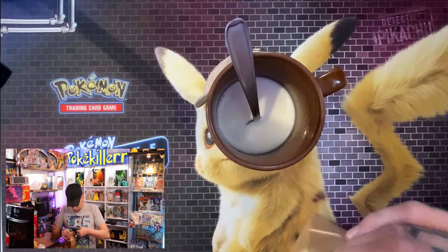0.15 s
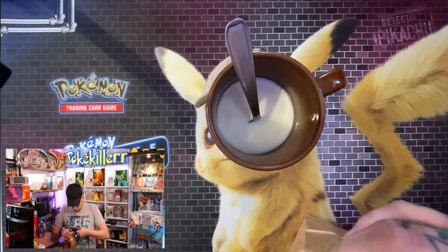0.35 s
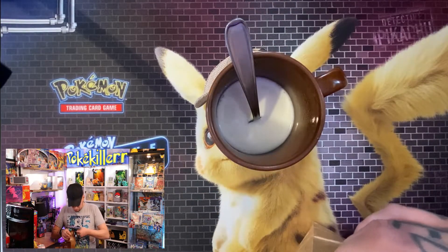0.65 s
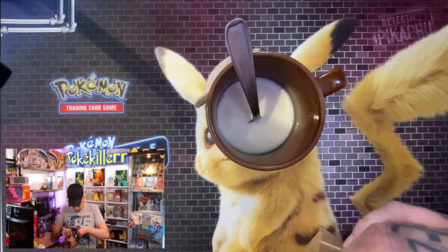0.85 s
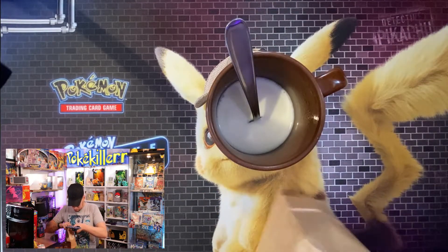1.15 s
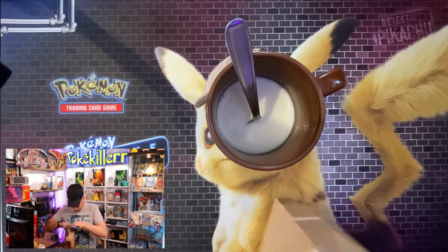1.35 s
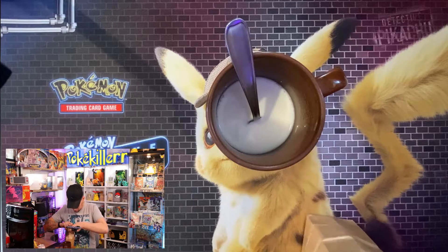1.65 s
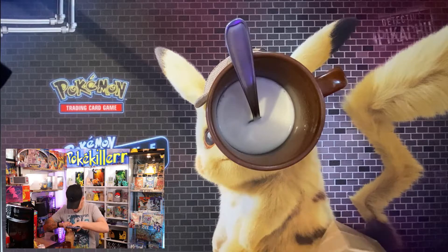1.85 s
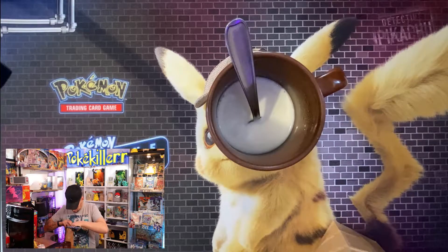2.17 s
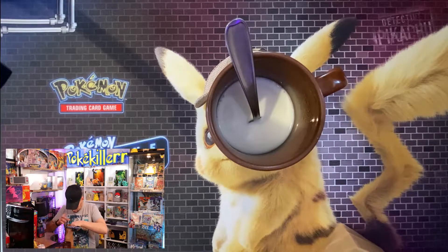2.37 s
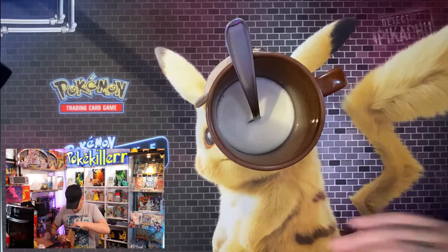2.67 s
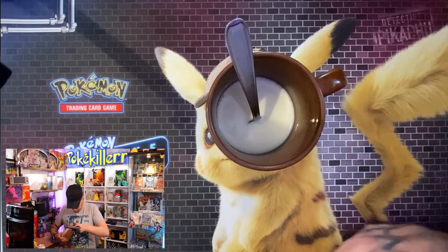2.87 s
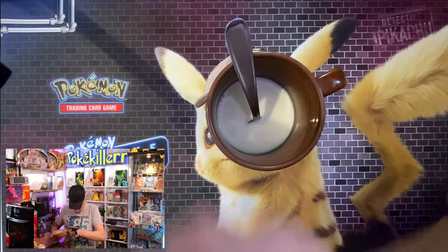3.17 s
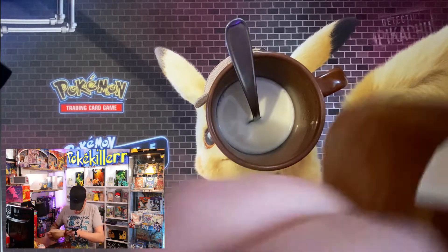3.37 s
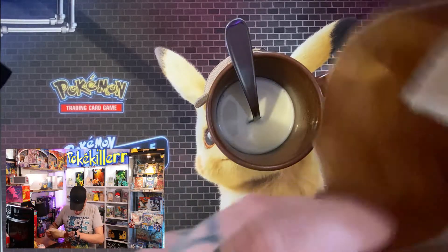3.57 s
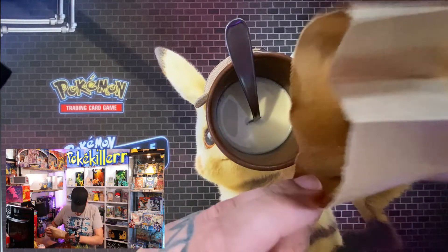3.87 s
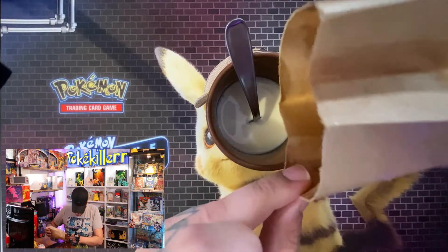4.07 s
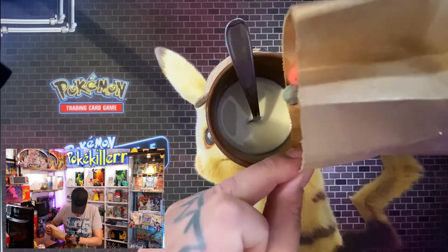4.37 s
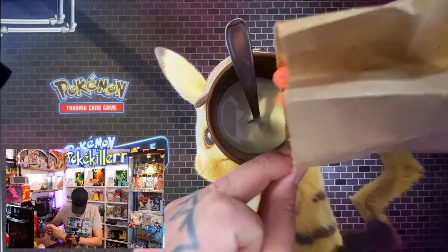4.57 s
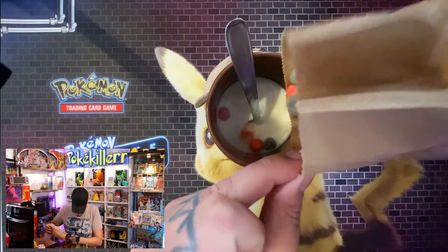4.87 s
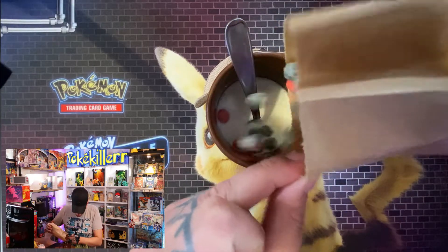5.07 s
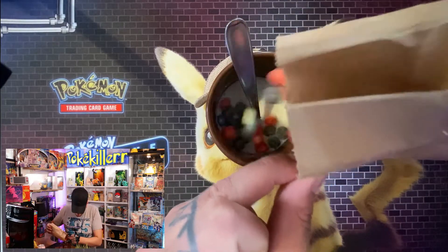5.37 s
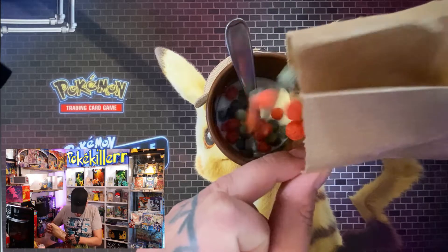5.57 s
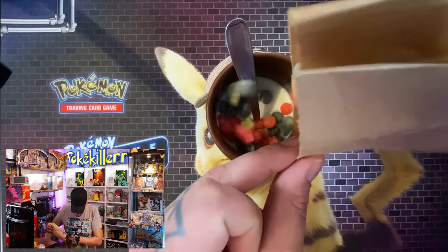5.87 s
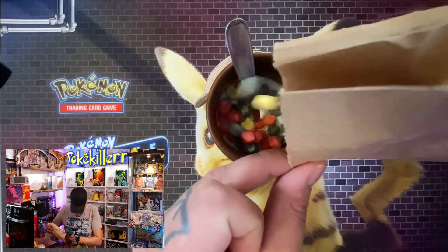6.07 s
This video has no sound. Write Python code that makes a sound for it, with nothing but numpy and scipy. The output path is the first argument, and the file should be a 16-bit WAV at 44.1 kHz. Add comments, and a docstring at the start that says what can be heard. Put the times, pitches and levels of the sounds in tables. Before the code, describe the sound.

A small, quiet room with a faint low rumble and mains hum, heard by a close stereo microphone. From 0 to 0.6 seconds a paper bag gives soft crinkles and a dull bump, then thins to near quiet. From 0.7 the creasing grows sharp, and between 1.0 and 2.1 it is very loud: hard, bright cracks and dense crackle with low thumps, the strongest slightly clipped. It drops away around 2.2 to 2.6, then a few firm folds and a hollow bump come at 2.6 to 2.9. Softer, boxy rustling and small snaps follow from 3.0 to 4.3 as the bag is opened and tipped. From about 4.4 the first pieces clink in a mug; from 4.9 to the end at about 6.2, cereal tumbles steadily with papery rustle, dry bright ticks, soft thumps and short, quickly damped ceramic clinks.

```python
"""In a small room with a faint low rumble, a paper bag is crumpled open, then tipped to pour cereal into a mug.
Creases snap: a short crack, then noise shaped by the paper and the air inside. A dense crackle of tiny
bursts and knocks fills the gaps, with soft low thumps as the load shifts. Later, pieces ring the mug as
fading sine waves and click on each other as short bright noise. The room answers with a random, fading tail."""
import sys
import numpy as np
from scipy import signal
from scipy.fft import rfft, irfft, next_fast_len
from scipy.io import wavfile
from scipy.ndimage import uniform_filter1d

SR = 44100
rng = np.random.default_rng(int(sys.argv[2]) if len(sys.argv) > 2 else 0)


def dump_mix(stems):
    """Bounce the given channels to the path in sys.argv[1] as a 16-bit WAV at rate SR."""
    frames = np.atleast_2d(stems).T  # one column per channel
    limited = np.clip(frames, -1, 1)  # hard clip at full scale
    pcm = np.round(limited * 32767).astype(np.int16)
    wavfile.write(sys.argv[1], SR, pcm)


N = 274434  # length in samples

# The colour of the steady room sound. Each row: frequency in Hz, relative level in dB per Hz.
ROOM_TONE = [(30, -22), (45, -17), (54, -10), (59.5, 9.5), (65, -4), (300, -15), (900, -22), (3000, -19.5),
             (8000, -39), (15600, -26.5)]
# The background crackle, rising and falling. Each row: time in seconds, level of the middle part in dB,
# then the hollow and the crisp part in dB against the middle.
RUSTLE = [(0, -36.5, 2, -9.5), (.15, -52, 8, -2.5), (.52, -57, 4, -2), (.68, -52, 5, -6),
          (.75, -39, -9, -2), (1.1, -37, -0.5, -6), (1.4, -44.5, -6, -7), (2.2, -37.5, -0.5, -13),
          (2.32, -45, 7.5, -6), (2.45, -55, -5, -7), (2.58, -77, 27, -19), (2.7, -36.5, 8, -9.5),
          (3.15, -40.5, -3, -7), (3.4, -45, -2, -11.5), (3.5, -37.5, 4, -12.5), (3.9, -35, 2.5, -8),
          (5.3, -35.5, 1.5, -8), (5.75, -38.5, 0, -5.5), (6.22, -36.5, 0.5, -9.5)]
# Squeezes and shakes of the bag, each a swell of crackle. Each row: time at full level in seconds,
# level of the middle part in dB, hold in seconds, hollow part in dB against the middle.
SQUEEZES = [(0.252, -39.5, 0.0098, -2), (0.843, -37, 0.11, -0.5), (1.128, -34.5, 0.091, 3),
            (1.236, -31, 0.023, -1), (1.3, -19.5, 0.026, -9), (1.44, -25, 0.0042, 0),
            (1.5, -33, 0.13, -4.5), (1.685, -19.5, 0.017, -2), (1.741, -21, 0.018, -4.5),
            (1.765, -17.5, 0.01, 1), (1.826, -34.5, 0.013, 5), (1.942, -32, 0.015, 5.5),
            (2.029, -18, 0.0063, 1.5), (2.082, -25, 0.016, 0.5), (2.621, -29.5, 0.041, 6),
            (2.808, -29.5, 0.024, 2), (2.89, -33.5, 0.012, 4), (3.023, -45.5, 0.014, 14.5),
            (3.144, -41, 0.1, 8.5), (3.482, -36, 0.018, 4), (3.577, -35.5, 0.006, 7.5),
            (3.648, -43, 0.0087, 15), (3.722, -34, 0.0079, 3), (3.765, -31.5, 0.012, 4.5),
            (3.807, -29.5, 0.023, 0), (4.143, -34, 0.043, 2), (4.387, -35.5, 0.028, -15),
            (4.65, -39, 0.033, -5), (4.722, -31.5, 0.0086, 5), (4.814, -37, 0.016, 9),
            (4.922, -37, 0.013, 5.5), (5.037, -38, 0.011, -14), (5.08, -44, 0.0074, 11),
            (5.19, -32.5, 0.061, -5), (5.593, -36.5, 0.023, 6.5), (5.875, -28.5, 0.01, 1.5),
            (6.1, -39, 0.021, 6)]
# The broad colour of paper. Each row: frequency in Hz, relative level in dB per Hz.
PAPER = [(47, -48), (80, -12), (236, -7.5), (314, -5), (350, -7), (945, 0.5), (1290, -2.5), (3550, -8),
         (8770, -22.5), (13900, -28.5), (15600, -36)]
# Resonances of the bag's air and walls. Each row: frequency in Hz, width in Hz, boost in dB.
BAG = [(1080, 470, 1), (3395, 880, 6), (2340, 860, 2.5), (5150, 2000, 6.5)]
# The bag's load shifts and bumps the desk. Each row: start in seconds, level in dB, tone in Hz.
THUMPS = [(0.0523, -22.5, 568), (0.917, -28, 311), (1.199, -23.5, 266), (1.279, -27, 263), (1.69, -18, 322),
          (2.025, -27, 268), (2.628, -39, 443), (2.838, -20.5, 458), (3.575, -32, 386), (3.722, -24, 344),
          (3.811, -29.5, 146), (4.6, -29.5, 317), (4.729, -32, 133), (5.605, -29, 399), (5.639, -22.5, 486),
          (5.719, -27.5, 493)]
# Single creases. Each row: start in seconds, level in dB, tone of the sheet in Hz, # then the hollow and the
# crisp part in dB against the middle part. # The row at 1.3081 s is not a crease of its own: it is the wall's
# slap of the crease just before it.
SNAPS = [(0.053, -25.5, 1850, 11, -30), (0.099, -20, 4700, -19, -7), (0.162, -22, 3100, -18, -31),
         (0.258, -33.5, 4470, -8, 7), (0.387, -23, 4700, -2, -15), (0.5649, -20, 2280, 2.5, -23),
         (0.7077, -12.5, 3820, 1, -6.5), (0.7515, -19, 3570, 1.5, -6), (0.8026, -32.5, 3040, 14.5, 3),
         (0.8419, -8.5, 3720, -5.5, -8), (0.8606, -10, 3300, -29, -10), (0.9207, -16.5, 2900, 6.5, -25),
         (0.9445, -23.5, 1930, 10, -23), (.996, -10.5, 2480, -27, -29), (1.019, -1, 3330, -33, -6),
         (1.1106, -17, 2310, -8, -4.5), (1.1555, -6, 2940, -5, -37), (1.1867, -8.5, 2960, -6, -28),
         (1.2251, -7, 3650, -20, -28), (1.269, -4, 2090, -9, -32), (1.2936, -0.5, 1950, -8, -10),
         (1.3081, -3, 2030, -0.5, -5), (1.3338, -1, 2800, -11, -3.5), (1.428, -1.5, 4500, -9.5, -4.5),
         (1.5241, -5.5, 3100, -4.5, -9), (1.5995, -17.5, 4300, -1, -12), (1.6179, -13, 1760, 1.5, -25),
         (1.6558, -3, 3230, -40, -12), (1.679, 4, 4300, -37, -5.5), (1.7719, -2.5, 3840, -11, -3),
         (1.8278, -28.5, 2270, 20, -20), (1.9433, -1, 1850, -8.5, -43), (2.018, -15, 3500, 4, -7),
         (2.024, -3.5, 1520, 2, -17), (2.0278, 0, 2570, -20, -6), (2.0504, 5, 4160, -19, -9),
         (2.0684, -2.5, 1670, 0, -4.5), (2.2038, -34.5, 1700, -15, 9.5), (2.254, -27.5, 1670, 16, -48),
         (2.5239, -25, 1900, 6, -40), (2.617, -25, 2100, 9, -58), (2.7089, -15.5, 2000, 1.5, -38),
         (2.766, -5.5, 2050, -15, -15.5), (2.813, -16, 2500, -4, -9), (2.826, -9.5, 1710, -14, -6),
         (2.893, -16.5, 2080, -4.5, -23), (3.0269, -14.5, 3350, -14, -14), (3.3235, -15, 2120, 1.5, -14),
         (3.5715, -19.5, 2580, 11, -15), (3.644, -14, 3580, -21, -11), (3.7192, -20.5, 2800, 8.5, -3),
         (3.7641, -9, 2300, -0.5, -15), (4.351, -28, 3000, -8, -9), (4.6559, -7, 4830, -35, -11),
         (4.7176, -10, 2550, -5, -17), (4.867, -20, 3460, -11, -13), (5.01, -18, 3480, -20, -7),
         (5.079, -17, 2500, -6, -20), (5.178, -23, 3470, -22, -5), (5.328, -15.5, 3270, -3, -5.5),
         (5.466, -19, 3150, -13, -8), (5.8186, -23, 1970, 8.5, 0), (5.879, -7, 3640, -32, -7),
         (5.9448, -22.5, 3110, -6, -1), (6.107, -16, 3280, -10, -22)]
# Pieces striking the mug. Each row: start in seconds, blow in dB,
# then the extra level in dB of the mug's first and last mode.
CLINKS = [(4.4662, -27, 7, -3), (4.658, -28, 11, -14), (4.7606, -31, -2, -4), (4.813, -25, 4, -4),
          (4.9322, -26, 3, -1), (5.0345, -24, 2, -9), (5.2031, -23.5, 5.5, -9), (5.2355, -25, -6, -2),
          (5.2934, -31, -5, -5), (5.3652, -23, 3, -9), (5.3882, -30, 9, -14), (5.5029, -22, 4, -12),
          (5.5165, -27, -4, -4), (5.5528, -27, 2, -7), (5.6311, -23.5, -10, 0), (6.0317, -26, 0, -14),
          (6.1963, -24, 8, -4)]
# The mug's ringing modes. Each row: frequency in Hz, level in dB, time to fall by 60 dB in seconds.
MUG = [(2295, -4.5, .05), (5830, -7, .04), (6420, -5, .04), (7890, -16, .04), (9400, -9, .03),
       (9580, -12, .045), (13900, -1, .022)]
# The slap from one hard wall. Each row: frequency in Hz, level in dB.
ECHO = [(500, -14), (5000, -12), (14000, -2)]
# Sound that the two ports do not share. Each row: frequency in Hz, level in dB.
APART = [(60, -23), (300, -8.5), (1000, -14), (2500, -17), (5000, -10), (9000, -1.5), (15000, -5.5)]
# Timing between the two ports. Each row: frequency in Hz, lead of the left port in radians.
PORTS = [(100, 0), (5000, .3), (7500, 1.2), (9200, 3), (12000, 5), (15000, 5.7)]

# T60 is the time a sound takes to fall by 60 dB
HOLLOW_HZ, CRISP_HZ = 1580, 6060  # where the bag's hollow tone ends and the crisp top begins
ROOM_TONE_DB = -50.5
HUM_HZ, HUM_DB, HUM_LEFT_DB = 49.9, -58.5, 5  # mains hum, and how much stronger it is on the left
SWELL_DB_PER_S, FADE_DB_PER_S = 795, 277  # how fast a squeeze rises and falls
SQUEEZE_CRISP_DB = -7.5  # crisp part of a squeeze against its middle
TINY_CREASES_PER_S, KNOCK_COUNT, KNOCKS_DB = 1500, 2500, -10.5  # knocks against the fine grain
OPEN_S, AIR_HZ, AIR_WIDTH_HZ, AIR_DB = 3.3, 960, 130, 8  # bag's air colours the crackle until it stands open
SNAP_T60_S, LONGER_PER_DB = 0.123, .02  # ring of a 0 dB crease; softer ones ring longer by this share
CRACK_CYCLES = 1.25  # cycles in which a crack falls to 37 percent
CRACK_DB, CRACK_PER_DB = 13, .2  # crack over the shiver for a 0 dB crease; softer ones crack less
CAVITY_HZ, CAVITY_WIDTH_HZ, CAVITY_DB = 835, 430, 7  # air in the bag, rung by each crease
CRISP_EXTRA_T60_S = .04  # added fading, so the top of a crease dies first
POUR_S, TICKS_PER_S, SOFTEST_TICK_DB, TICK_HZ = 4.85, 25, -32, 5000  # ticks are bright above TICK_HZ
ROOM_T60_S, ROOM_TOP_T60_S, ROOM_DB = 0.18, 0.063, -9.5  # low part, treble, level of the tail
ECHO_S, ECHO_SPREAD_S = .0144, .0007  # shortest delay of the wall's slap, and its random extra
RIGHT_DB, TOP_HZ = .4, 15730  # boost of the right port, and where the treble is cut


def undb(db):
    """Turn decibels into a plain gain."""
    return 10 ** (np.asarray(db) / 20)


def unit(x):
    """Scale a sound to an average (rms) level of 1."""
    return x / np.sqrt(np.mean(x ** 2))


def along(table, hz):
    """Read a table of (Hz, value) rows on a log-frequency axis."""
    f, v = np.transpose(table)
    return np.interp(np.log(hz + 1), np.log(f + 1), v)


def colour(x, gain):
    """Filter a sound by multiplying its spectrum by gain(Hz)."""
    n = next_fast_len(x.shape[-1])
    hz = np.arange(n // 2 + 1) * SR / n
    return irfft(rfft(x, n) * gain(hz), n)[..., :x.shape[-1]]


def resonance(hz, centre_hz, width_hz):
    """A smooth bump of height 1, half as high at half its width from the centre."""
    return 1 / (1 + (2 * (hz - centre_hz) / width_hz) ** 2)


def fade(t60, size):
    """A smooth die-away that drops 60 dB in t60 seconds."""
    return np.exp(-np.log(1000) * np.arange(size) / SR / t60)


def paper(hz):
    """Gain of the bag: the broad colour of paper with its resonances on top."""
    bumps_db = sum(db * resonance(hz, f, width) for f, width, db in BAG)
    return undb(along(PAPER, hz) + bumps_db)


def three_parts(x, tone_hz=3000, tone_db=0):
    """Colour a sound like paper and split it into hollow, middle and crisp parts, each of rms 1."""
    def low(hz):
        return 1 / (1 + (hz / HOLLOW_HZ) ** 4)

    def top(hz):
        return 1 - 1 / (1 + (hz / CRISP_HZ) ** 8)

    def middle(hz):
        tone_bump = 1 / (1 + (9 * np.log(hz / tone_hz + 1e-9)) ** 2)
        return (1 - low(hz) - top(hz)) * undb(tone_db * tone_bump)

    return np.array([unit(colour(x, lambda hz: paper(hz) * part(hz))) for part in (low, middle, top)])


def room_tone():
    """Steady hush with low rumble and mains hum; the ports share most of the bass and less of the hiss."""
    mid, side = colour(rng.standard_normal((2, N)), lambda hz: undb(along(ROOM_TONE, hz)))
    side = colour(side, lambda hz: 0.16 + 0.66 * hz ** 2 / (hz ** 2 + 4000 ** 2))
    hush = undb(ROOM_TONE_DB) * unit(mid + side * np.array([[1], [-1]]))
    hum_wave = np.sqrt(2) * np.sin(2 * np.pi * HUM_HZ * np.arange(N) / SR)
    hum_gain = undb(HUM_DB + HUM_LEFT_DB * np.array([[.5], [-.5]]))
    return hush + hum_wave * hum_gain


def handling():
    """Gains of the crackle's three parts: the changing bed plus squeezes that swell, hold and fade."""
    t = np.arange(N) / SR
    s, db, hollow_db, crisp_db = np.transpose(RUSTLE)
    # doubled decibels give power, so the layers add like separate noises
    power = np.array([undb(2 * np.interp(t, s, db + part_db)) for part_db in (hollow_db, 0, crisp_db)])
    for start, db, hold, hollow_db in SQUEEZES:
        rise_db = SWELL_DB_PER_S * np.maximum(start - t, 0)
        fall_db = FADE_DB_PER_S * np.maximum(t - start - hold, 0)
        parts_db = np.array([[hollow_db], [0], [SQUEEZE_CRISP_DB]])
        power += undb(2 * (db - rise_db - fall_db)) * undb(2 * parts_db)
    return np.sqrt(power)


def rustle():
    """Tiny creases as bursts of noise; larger folds and cereal pieces knock, each on its own note."""
    creases = rng.random(N) < TINY_CREASES_PER_S / SR
    creases = creases * undb(np.minimum(3 * rng.exponential(size=N), 14))
    energy = signal.fftconvolve(creases ** 2, fade(0.024, size=2048) ** 2)[:N]
    # the hand works in small jerks
    jerks = uniform_filter1d(np.repeat(rng.standard_normal(N // 600 + 1), 600), size=400)[:N]
    grain = unit(rng.standard_normal(N) * np.sqrt(np.abs(energy)) * undb(0.25 * jerks))

    knocks, t = np.zeros(N + 1024), np.arange(1024) / SR
    for place, note, blow in rng.random((KNOCK_COUNT, 3)):
        hz = 400 * 15 ** note  # 400 to 6000 Hz
        wave = np.sin(2 * np.pi * hz * t) * np.exp(-hz * t / 4.16)
        i = int(place * N)
        # high notes die sooner, so they start stronger
        knocks[i:i + 1024] += undb(7.4 * blow) * np.sqrt(hz) * wave

    parts = three_parts(grain + undb(KNOCKS_DB) * unit(knocks[:N]))
    boxy = unit(colour(parts[0], lambda hz: undb(AIR_DB * resonance(hz, AIR_HZ, AIR_WIDTH_HZ))))
    parts[0] = np.where(np.arange(N) < OPEN_S * SR, boxy, parts[0])
    return np.sum(handling() * parts, axis=0)


def thumps():
    """Soft low blows: sine waves that rise in about a millisecond and die fast."""
    size = 4096
    out, t = np.zeros(N + size), np.arange(size) / SR
    shape = (1 - np.exp(-t / 0.0005)) * fade(0.07, size)
    for s, db, hz in THUMPS:
        i = int(s * SR)
        out[i:i + size] += undb(db) * np.sin(2 * np.pi * hz * t) * shape
    return out[:N]


def snaps():
    """Each crease cracks for a few cycles, then the sheet shivers around its own tone."""
    size, lead = 8192, 200  # samples; the silent lead leaves room for the filters to spread backwards
    out = np.zeros(N + size)
    for s, db, tone_hz, hollow_db, crisp_db in SNAPS:
        t60 = SNAP_T60_S * (1 - LONGER_PER_DB * db)
        shiver = rng.standard_normal(size)
        shiver[:lead] = 0
        turns = np.arange(size - lead) * tone_hz / SR  # cycles since the start
        crack = (np.sin(2 * np.pi * turns) + 0.53 * shiver[lead:]) * np.exp(-turns / CRACK_CYCLES)
        shiver[lead:] *= fade(np.clip(t60, .01, .5), size - lead)
        shiver[lead:] += undb(CRACK_DB + CRACK_PER_DB * db) * crack
        # a short shiver packs the same peak into less energy
        level = np.sqrt(t60 * SR / size / 14) / 5.38
        tone_db = 3.0 + 2.5 * max(hollow_db, 0)  # hollow knocks ring purer
        hollow, middle, crisp = level * three_parts(shiver, tone_hz, tone_db)
        # half the cavity's boost goes up at its tone, half comes off elsewhere
        hollow = colour(hollow, lambda hz: undb(CAVITY_DB * (resonance(hz, CAVITY_HZ, CAVITY_WIDTH_HZ) - .5)))
        crisp[lead:] *= fade(CRISP_EXTRA_T60_S, size - lead)
        crisp = level * unit(crisp)
        i = int(s * SR)
        out[i:i + size] += undb(db) * (undb(hollow_db) * hollow + middle + undb(crisp_db) * crisp)
    return out[lead:N + lead]


def mug():
    """Every blow rings the same modes as fading sine waves, each a little more or less."""
    size = 8192
    out, t = np.zeros(N + 2 * size), np.arange(size) / SR
    for s, db, low_db, top_db in CLINKS:
        spot_db = 2.5 * rng.standard_normal(len(MUG))
        spot_db[0], spot_db[-1] = low_db, top_db  # where the piece lands sets the outer modes
        i = int(s * SR)
        for (hz, mode_db, t60), extra_db in zip(MUG, spot_db):
            wave = np.sin(2 * np.pi * hz * t) * fade(t60, size)
            out[i:i + size] += undb(db + mode_db + extra_db) * wave
    return out[:N]


def ticks():
    """Dry cereal pieces click together as they fall: sparse, bright bursts of noise during the pour."""
    chance, strength = rng.random((2, N))
    pouring = np.arange(N) > POUR_S * SR
    clicks = (chance < TICKS_PER_S / SR) * pouring * undb(SOFTEST_TICK_DB + 6.9 * strength)
    bursts = rng.standard_normal(N) * signal.fftconvolve(clicks, fade(0.0031, size=512))[:N]
    return colour(bursts, lambda hz: 1 - 1 / (1 + (hz / TICK_HZ) ** 4))


def room(x, wet_db):
    """Direct sound, scatter off desk and hands, a wall's slap and a tail; all but the direct keep changing."""
    size, hop = SR // 2, 2048
    out = np.zeros((2, N + size + 2 * hop))  # mid (shared by the ports) and side (opposite in them)
    x = np.concatenate([np.zeros(hop), x, np.zeros(2 * hop)])
    # the bag moves about, so each short overlapping piece gets a fresh answer
    for i in range(0, N + hop, hop):
        mid, side, scatter = rng.standard_normal((3, size))
        noise = np.array([mid, side])
        low = colour(noise, lambda hz: 1 / (1 + (hz / 3000) ** 2))
        tail = low * fade(ROOM_T60_S, size) + (noise - low) * fade(ROOM_TOP_T60_S, size)
        tail[:, :150] = 0  # the walls answer a few ms late
        tail *= undb(wet_db) / np.sqrt(np.sum(tail[0] ** 2))

        slap = np.arange(size) == int((ECHO_S + ECHO_SPREAD_S * rng.random()) * SR)
        tail[0] += colour(1. * slap, lambda hz: undb(along(ECHO, hz)))

        scatter *= fade(0.038, size)
        scatter /= np.sqrt(np.sum(scatter ** 2))
        tail[1] = colour(tail[1] + scatter, lambda hz: undb(along(APART, hz)))

        piece = x[i:i + 2 * hop] * np.sqrt(np.hanning(2 * hop))
        heard = signal.fftconvolve(piece[None], tail, axes=1)[:, :len(out[0]) - i]
        out[:, i:i + heard.shape[1]] += heard
    mid = out[0, hop:N + hop] + x[hop:N + hop]
    side = out[1, hop:N + hop]
    return np.array([mid + side, mid - side])


def scene():
    """All sources sound in the room, over its steady tone."""
    sources = rustle() + snaps() + thumps() + mug() + ticks()
    return room(sources, ROOM_DB) + room_tone()


def record(dry):
    """A two-port microphone hears the treble out of step; the loudest peaks clip; the top is cut."""
    left = colour(dry[0], lambda hz: np.exp(.5j * along(PORTS, hz)))
    right = colour(dry[1], lambda hz: np.exp(-.5j * along(PORTS, hz))) * undb(RIGHT_DB)
    clipped = np.clip([left, right], -1, 1)
    top_cut = signal.ellip(12, .2, 70, TOP_HZ, fs=SR, output="sos")
    return signal.sosfilt(top_cut, clipped)


dry = scene()
out = record(dry)
dump_mix(out)
```